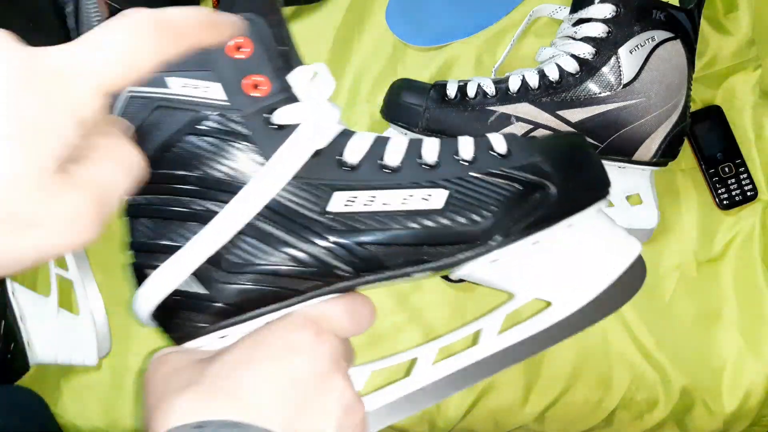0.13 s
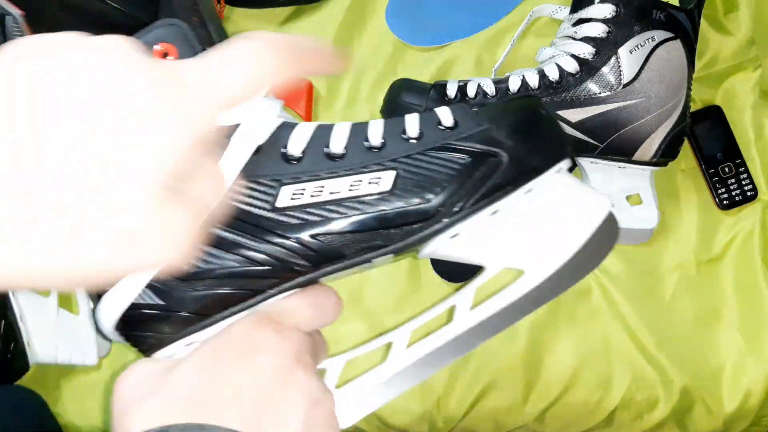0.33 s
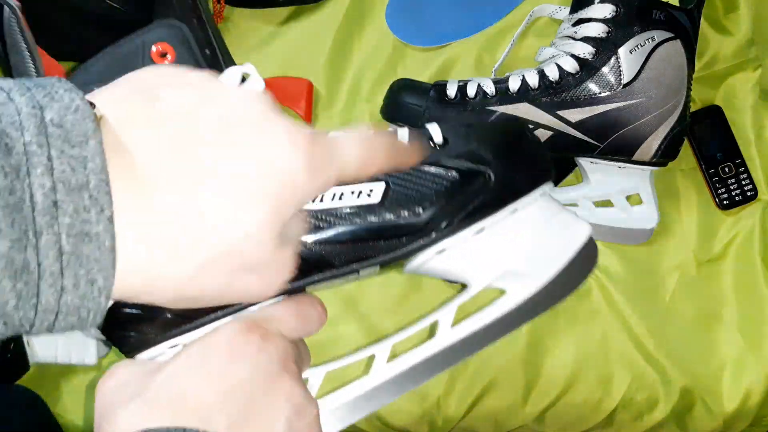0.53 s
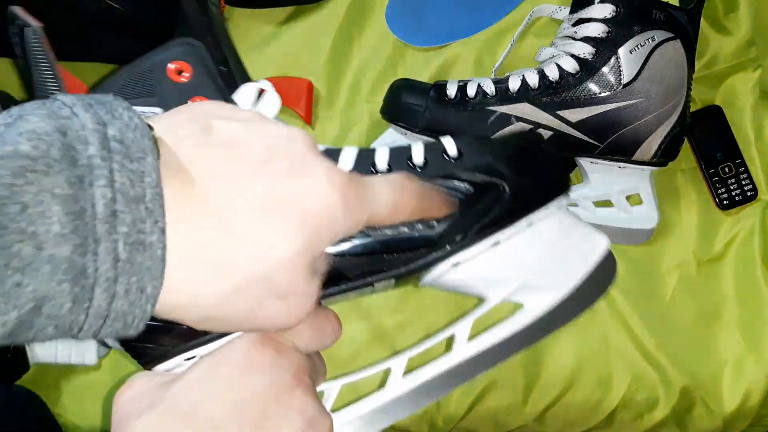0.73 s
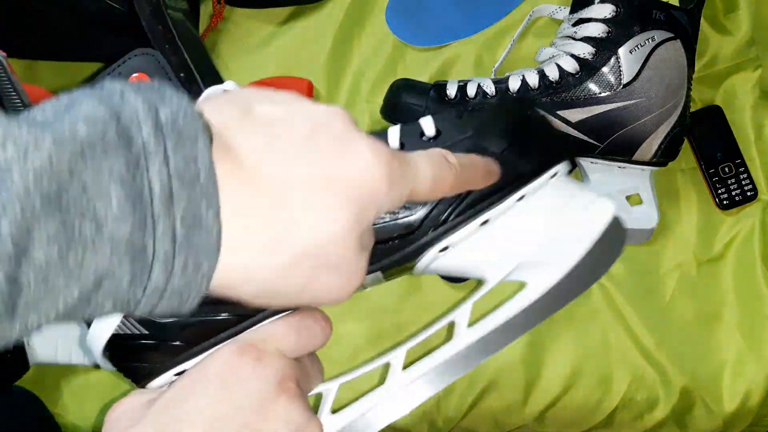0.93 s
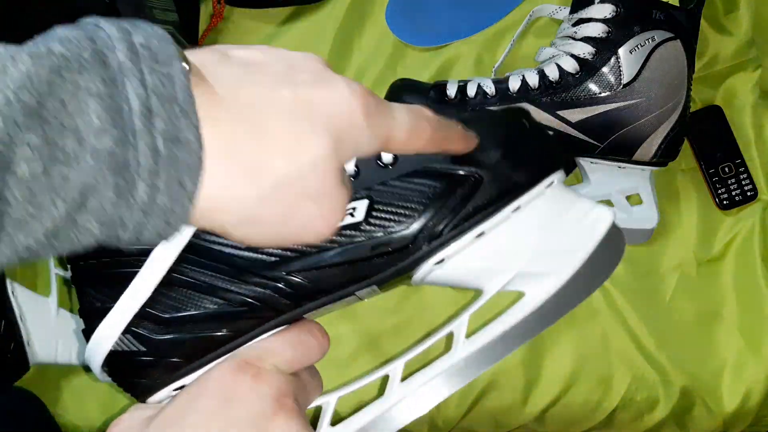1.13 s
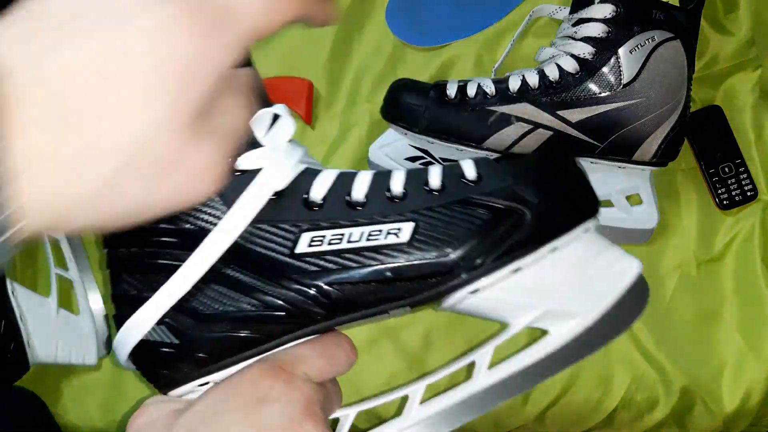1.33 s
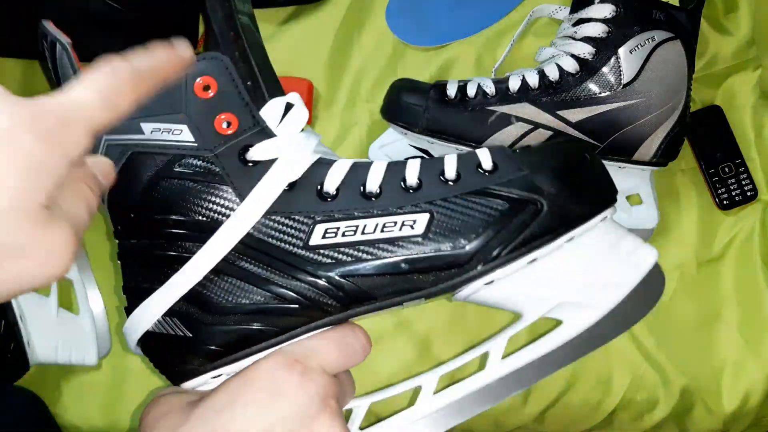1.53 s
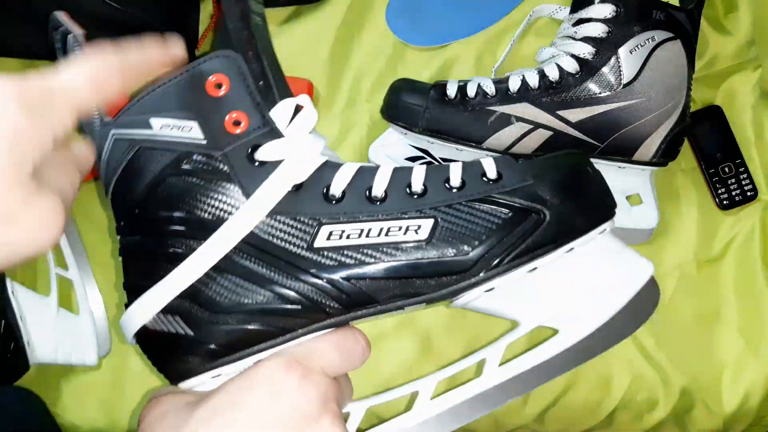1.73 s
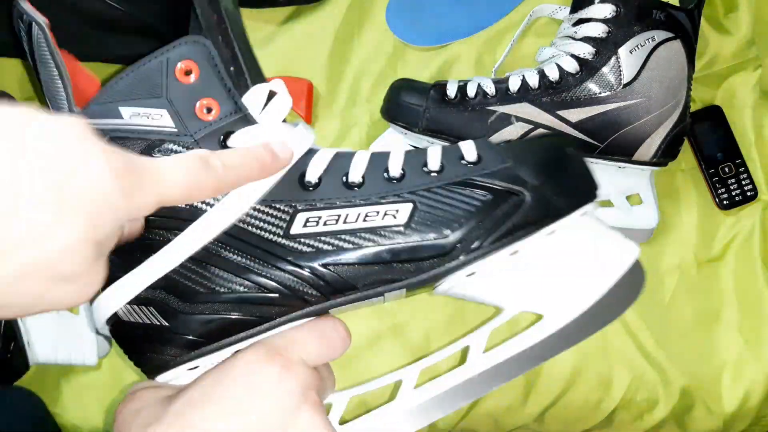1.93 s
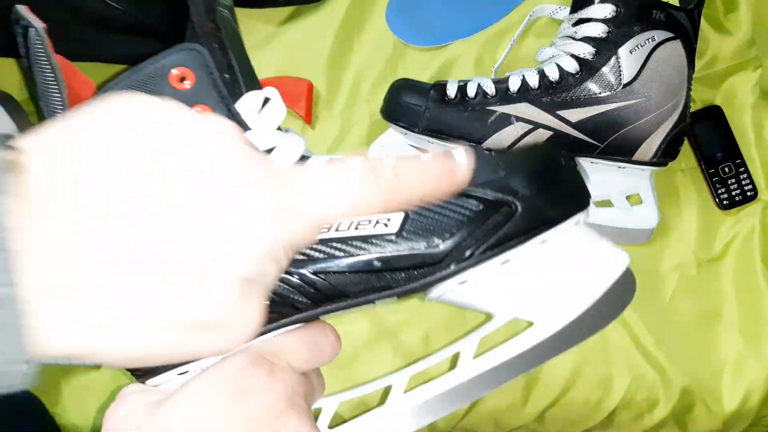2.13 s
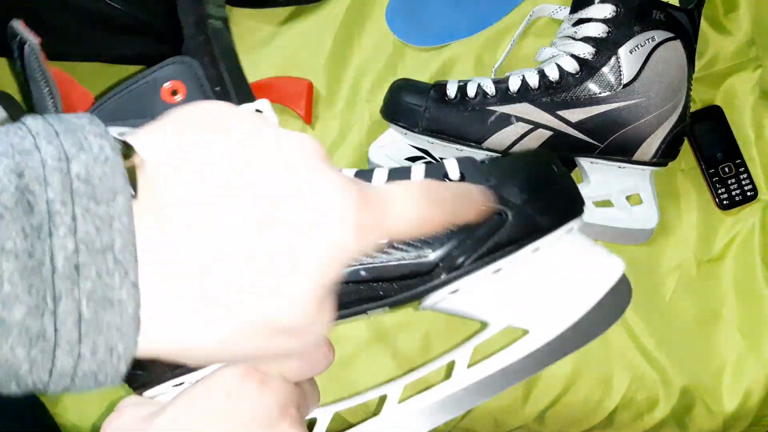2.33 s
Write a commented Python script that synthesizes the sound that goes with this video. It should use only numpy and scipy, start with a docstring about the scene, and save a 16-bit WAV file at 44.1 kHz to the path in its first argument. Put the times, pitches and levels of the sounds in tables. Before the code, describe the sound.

A finger taps a hard plastic skate boot, hollow knocks with small nail clicks, close up indoors

```python
"""Finger taps on a skate boot

A finger taps along the hard plastic shell of an ice skate boot, close to the microphone in a small, quiet room.
Each tap sums damped sines: a low thump, a hollow knock of the side wall and a brief ring of the shell.
Noise bursts and a short high ping make the nail's click; grainy noise makes its skids.
Light ticks, sleeve rustles and deep bumps of the swaying boot fall between the taps.
The room answers with a few low modes and a short noise tail, over faint rumble, hiss, whines and a low hum."""
import sys
import numpy as np
from scipy import signal
from scipy.fft import rfft, irfft, next_fast_len
from scipy.io import wavfile
from scipy.ndimage import uniform_filter1d

SR = 44100
rng = np.random.default_rng(int(sys.argv[2]) if len(sys.argv) > 2 else 0)


def waveform_to_disk(signal):
    """Save audio, clipped to [-1, 1], as 16-bit WAV at the path in sys.argv[1]."""
    frames = np.transpose(np.atleast_2d(signal))
    scaled = np.clip(frames, -1, 1) * 32767
    samples = np.round(scaled).astype(np.int16)
    wavfile.write(sys.argv[1], SR, samples)


N = 109544  # samples in the scene


def amp(db):
    """Decibels to gain."""
    return 10 ** (np.asarray(db) / 20)


def unit(x):
    """Scaled to rms 1."""
    return x / np.sqrt(np.mean(x ** 2) + 1e-20)


def along(points, hz):
    """Read a curve of (Hz, value) points on a log frequency axis."""
    f, v = np.transpose(points)
    return np.interp(np.log(hz + 1), np.log(f + 1), v)


def fade(t, t60):
    """Exponential decay by 60 dB in t60 seconds."""
    return np.exp(-np.log(1000) * t / t60)


def swell(s, width, db):
    """A bell-shaped level stroke centred on time s."""
    t = np.arange(N) / SR
    return amp(db) * np.exp(-((t - s) / width) ** 2 / 2)


def filtered(x, response):
    """Multiply the spectrum of x by a response of frequency, padded against wrap-around."""
    n = x.shape[-1]
    m = next_fast_len(n + SR // 4)
    hz = np.fft.rfftfreq(m, 1 / SR)
    return irfft(rfft(x, m) * response(hz), m)[..., :n]


def noise(spectrum, size):
    """Coloured noise of rms 1."""
    return unit(filtered(rng.standard_normal(size), lambda hz: amp(along(spectrum, hz))))


def ring(t, hz, t60, rise):
    """One damped mode with a soft start."""
    return np.sin(2 * np.pi * hz * t) * fade(t, t60) * (1 - np.exp(-t / rise)) ** 2


def lean(db):
    """Gains that raise the left by db and lower the right by as much."""
    return amp(np.array([[db], [-db]]))


def add(track, s, sound):
    """Mix a sound into the track at time s, trimmed at both ends of the track."""
    i = round(s * SR)
    part = sound[..., max(-i, 0):N - i]
    start = max(i, 0)
    track[..., start:start + part.shape[-1]] += part


# Stereo likeness of diffuse sound. Each row: frequency in Hz, left-right correlation (0 to 1).
LIKENESS = [(100, 0.97), (300, 0.85), (700, 0.2), (2000, 0.13), (5000, .1), (15000, .05)]


def spread(pair):
    """Two unrelated signals become left and right, alike in the bass and separate in the treble."""
    def mid_side_gains(hz):
        turn = np.arccos(np.clip(along(LIKENESS, hz), -1, 1)) / 2
        return np.array([np.cos(turn), np.sin(turn)])

    mid, side = filtered(pair, mid_side_gains)
    return np.array([mid + side, mid - side])


ROOM_LEAN_DB = 1.46  # raises the left, lowers the right

# Colour of the rumble and hiss. Each row: frequency in Hz, relative level in dB.
AIR_COLOUR = [(20, -28.5), (35, -17), (55, -9), (86, 9.5), (110, -18), (190, -14.5), (280, -6.5),
              (380, -17.5), (500, -24), (1000, -31), (1800, -39), (2250, -39.5), (3000, -45), (6500, -46.5),
              (8600, -53), (12000, -45.5), (15500, -44)]
# Narrow whines in the air. Each row: centre in Hz, half width in Hz, rise over the colour in dB.
WHINES = [(820, 15, 8), (1020, 35, 3), (1480, 24, 11), (2300, 49, 10)]
# Slow drift of the air. Each row: time in seconds, level in dB before AIR_LIFT_DB.
AIR_DRIFT = [(0, -53.5), (.4, -54), (.65, -52), (.85, -58), (1.3, -55), (1.6, -55), (1.85, -59), (2.1, -59),
             (2.48, -51.5)]
AIR_LIFT_DB = 4


def air():
    """Room rumble and microphone hiss: coloured noise with narrow peaks and a drifting level."""
    def response(hz):
        peaks = sum(db / (1 + ((hz - f) / width) ** 2) for f, width, db in WHINES)
        return amp(along(AIR_COLOUR, hz) + peaks)

    level_db = AIR_LIFT_DB + np.interp(np.arange(N) / SR, *np.transpose(AIR_DRIFT))
    return lean(ROOM_LEAN_DB) * amp(level_db) * unit(filtered(spread(rng.standard_normal((2, N))), response))


HUM_HZ = 134
# The hum's comings and goings. Each row: time in seconds, sine peak in dB before the stereo lean.
HUM_LEVEL = [(0, -53), (.4, -68), (.55, -51.5), (1.0, -66), (1.35, -49.5), (1.6, -62), (2.48, -72)]


def hum():
    """A low steady sine whose level comes and goes."""
    t = np.arange(N) / SR
    level = amp(np.interp(t, *np.transpose(HUM_LEVEL)))
    return lean(ROOM_LEAN_DB) * level * np.sin(2 * np.pi * HUM_HZ * t)


# Standing waves of the room. Each row: frequency in Hz, level in dB, decay time t60 in seconds.
ROOM_MODES = [(93, -14.5, .4), (137, -12.5, 0.2), (254, 1.5, 0.3), (293.9, -6.5, 0.22), (390, -12.5, .3),
              (425, -14, 0.08), (606, -2.5, 0.093)]
# Decay of the diffuse tail. Each row: frequency in Hz, t60 in seconds.
TAIL_T60 = [(150, 0.29), (500, 0.27), (2000, 0.37), (6000, 0.17), (15000, 0.15)]
# Colour of the diffuse tail. Each row: frequency in Hz, level in dB against the direct sound.
TAIL_COLOUR = [(60, -14), (130, -4), (200, -7), (300, -23), (450, -11.5), (700, -10), (2000, -13),
               (5000, -3.5), (15000, -3.5)]
TAIL_BUILD_S, ROOM_MODE_DELAY_S = 0.011, 0.01374


def room(sound):
    """The room's answer to a sound: a diffuse tail and low standing waves."""
    # all bands of noise build up alike, and each dies at its own rate
    hz, s, bands = signal.stft(rng.standard_normal((2, SR // 2)), SR, nperseg=256)
    t60 = along(TAIL_T60, hz)[:, None]
    shape = fade(s, t60) * (1 - np.exp(-s / TAIL_BUILD_S))
    tail = signal.istft(bands * shape, SR, nperseg=256)[1]
    tail = spread(tail / np.linalg.norm(tail[0]))
    tail = filtered(tail, lambda f: amp(along(TAIL_COLOUR, f)))
    t = np.maximum(np.arange(tail.shape[1]) / SR - ROOM_MODE_DELAY_S, 0)
    waves = 0
    for f, db, life in ROOM_MODES:
        gain = amp(db) * 2 * np.log(1000) / (life * SR)  # evens out long and short modes
        waves = waves + gain * np.sin(2 * np.pi * f * t) * fade(t, life)
    answer = signal.fftconvolve(sound[None], tail + waves, axes=1)[:, :len(sound)]
    return lean(ROOM_LEAN_DB) * answer


# Lead of the left microphone port. Each row: frequency in Hz, phase between the ports in radians.
LEFT_LEAD = [(100, 0.044), (300, 0.32), (700, 1.2), (1500, 1.3), (2300, 0.41), (5000, 1.5), (15000, 2.1)]
BOOT_LEAN_DB, TREBLE_EXTRA_LEAN_DB = 2, 1.36  # raise the left, lower the right


def heard(sound, lean_db):
    """A sound on the boot reaches the left port first and louder, then the room answers."""
    port_share = np.array([[.5], [-.5]])  # left early, right late
    direct = filtered(sound, lambda hz: np.exp(1j * along(LEFT_LEAD, hz) * port_share))
    return lean(lean_db) * direct + room(sound)


# Strokes of the sleeve. Each row: middle in seconds, bell width in seconds, level in dB.
RUSTLES = [(.15, 0.044, -74), (2.418, 0.042, -53)]
# Colour of the cloth. Each row: frequency in Hz, relative level in dB.
CLOTH_COLOUR = [(150, 3), (290, 30.5), (500, 7), (1000, -16), (2200, 0.5), (3000, -24), (6000, -22.5),
                (9000, -50.5), (15000, -33)]


def rustles():
    """The sleeve rustles as the arm moves: swells of soft cloth noise."""
    strokes = sum(swell(*row) for row in RUSTLES)
    return heard(strokes * noise(CLOTH_COLOUR, N), BOOT_LEAN_DB)


# The boot sways in the holding hand. Each row: middle in seconds, bell width in seconds, level in dB.
SWAYS = [(0.974, 0.061, -51), (1.49, 0.018, -54)]
# Colour of the sway. Each row: frequency in Hz, relative level in dB.
SWAY_COLOUR = [(20, -30), (40, -5.5), (60, 13.5), (90, -9), (200, -43), (1000, -90)]


def sways():
    """Deep bumps of low noise as the boot sways, equal at both ports and without room."""
    return sum(swell(*row) for row in SWAYS) * noise(SWAY_COLOUR, N)


# Skids of the finger. Each row: middle in seconds, bell width in seconds, level in dB, tilt in dB per octave.
SKIDS = [(.248, 0.015, -55, -1), (0.483, 0.023, -58, -3.5), (0.738, 0.0087, -57, -2.5),
         (1.135, .008, -62.5, 1.5), (1.179, 0.0087, -53.5, -2), (1.94, .009, -52.5, 4),
         (1.979, 0.0068, -56, 6), (2.222, 0.011, -53.5, 4)]
# Colour of the friction before the tilt. Each row: frequency in Hz, relative level in dB.
SKID_COLOUR = [(300, -6), (1000, 21), (2200, 3), (3100, -2.5), (5000, -1.5), (7500, 2), (9000, -7.5),
               (15000, -1)]
TILT_PIVOT_HZ, SKID_ROUGH_DB = 800, 3.5  # roughness is the rms level wobble


def tilted(spectrum, tilt_db):
    """A spectrum made brighter or duller by tilt_db per octave."""
    return [(hz, db + tilt_db * np.log2(hz / TILT_PIVOT_HZ)) for hz, db in spectrum]


def skids():
    """Grainy friction as the finger slides a little on the textured shell."""
    rub = sum(swell(s, width, db) * noise(tilted(SKID_COLOUR, tilt_db), N)
              for s, width, db, tilt_db in SKIDS)
    wobble = unit(uniform_filter1d(rng.standard_normal(N), size=40))  # grains of about 1 ms
    grain = unit(amp(SKID_ROUGH_DB * wobble))
    return heard(grain * rub, BOOT_LEAN_DB)


# The nail touches again or the boot shifts. Each row: start in seconds, level in dB, t60 in seconds.
TICKS = [(.009, -50, 0.0068), (.256, -52, 0.0098), (0.331, -57.5, .008), (.378, -61.5, .008),
         (.486, -46.5, .022), (0.4903, -54.5, 0.013), (0.614, -65, 0.009), (0.7191, -51.5, 0.012),
         (.812, -60.5, 0.014), (0.9515, -50.5, 0.0091), (1.148, -52.5, 0.012), (1.1524, -49, 0.02),
         (1.977, -52, 0.0077), (2.0043, -61, .008), (2.095, -62, 0.007), (2.226, -46, .018),
         (2.2478, -53.5, 0.008)]
# Colour of a tick. Each row: frequency in Hz, relative level in dB.
TICK_COLOUR = [(800, -22), (3200, -5.5), (4800, 7.5), (6000, -2.5), (7300, 2), (8800, -16.5), (12000, 1.5),
               (15500, 0.5)]


def ticks():
    """Tiny contacts, too light to ring the shell: short fading noise bursts."""
    out, t = np.zeros((2, N)), np.arange(SR // 4) / SR
    for s, db, t60 in TICKS:
        tick = amp(db) * noise(TICK_COLOUR, len(t)) * fade(t, t60)
        add(out, s, heard(tick, BOOT_LEAN_DB + TREBLE_EXTRA_LEAN_DB))
    return out


CONTACT_HZ = 1480  # where a tap's dullness is read


def softened(dull_db, hz):
    """A soft contact lasts longer and so loses treble ever more steeply (dB)."""
    return -abs(dull_db) * (hz / CONTACT_HZ) ** 2


# The shell's higher modes. Each row: pitch in Hz before detuning, level in dB over the tap's shell level
# before softening, t60 in seconds.
SHELL_MODES = [(481, 1, 0.012), (633, -5.5, 0.067), (722, -4, 0.045), (908, -1, 0.02), (1037, 3, 0.012),
               (1155, -6.5, .03), (1268, -8.5, .035), (1680, -14.5, 0.018), (1880, -17, 0.0095),
               (2066, -8.5, 0.042), (2180, -9, 0.021), (2434, -7, 0.016)]
# Dense, quickly damped ring between those modes. Each row: frequency in Hz, relative level in dB.
CRACK_COLOUR = [(200, -21.5), (500, 4.5), (1100, -3), (1600, 4), (2400, 4.5), (2900, -24.5), (6000, -49),
                (15000, -73)]
CRACK_DB, CRACK_T60_S = -9, 0.027  # level against the tap's shell level
SPOT_DETUNE = 0.034  # typical share by which the higher modes shift from spot to spot
SHELL_ONSET_S = 0.0005


def shell_ring(t, shell_db, dull_db):
    """The struck shell rings in many modes over a dense crack; a dull contact excites less treble."""
    modes = 0
    for k, (hz, db, t60) in enumerate(SHELL_MODES):
        level_db = shell_db + db + softened(dull_db, hz) + rng.normal(0, 0.5)
        pitch = hz * (1 + SPOT_DETUNE * rng.normal())
        sign = (-1) ** k  # neighbouring modes start in opposite directions
        modes = modes + sign * amp(level_db) * ring(t, pitch, t60, SHELL_ONSET_S)
    colour = [(hz, db + softened(dull_db, hz)) for hz, db in CRACK_COLOUR]
    crack = noise(colour, len(t)) * fade(t, CRACK_T60_S) * (1 - np.exp(-t / SHELL_ONSET_S))
    return modes + amp(shell_db + CRACK_DB) * crack


# Colour of the nail's click. Each row: frequency in Hz, relative level in dB.
NAIL_COLOUR = [(500, -23.5), (2000, 0.5), (3100, -11), (4500, 6), (7300, 2), (8600, -0.5), (11000, 5.5),
               (15500, 4.5)]
CLICK_T60_S, PING_DB, PING_T60_S = 0.0092, 0, 0.0041  # ping level is over the tap's nail level


def nail_click(t, nail_db, nail_hz):
    """The hard nail gives a fading noise click and a very short high ping."""
    click = noise(NAIL_COLOUR, len(t)) * fade(t, CLICK_T60_S)
    ping = amp(PING_DB) * np.sin(2 * np.pi * nail_hz * t) * fade(t, PING_T60_S)
    return amp(nail_db) * (click + ping)


# The taps. Each row: start in seconds (below zero: begun before the scene), thump in dB, wall pitch in Hz,
# wall in dB, wall t60 in seconds, wall rise in seconds, rib pitch in Hz, rib in dB, shell in dB,
# dullness in dB lost at CONTACT_HZ (sign ignored), nail in dB, nail pitch in Hz.
# Thump, wall and rib levels are before the soft start.
TAPS = [(-.011, -20, 307, -11, 0.04, 0.0021, 388, -20, -41, -3.5, -51, 5950),
        (0.2254, -20.5, 318, 6.5, 0.023, 0.0032, 380, -23.5, -30.5, -14, -48, 4980),
        (0.4651, -24, 309, -15.5, 0.048, 0.0021, 419, -14, -26.5, -9, -51.5, 4830),
        (0.6958, -26.5, 237, -16.5, 0.026, 0.0024, 403, -19, -33.5, -7, -43.5, 7200),
        (0.9257, -26.5, 284, -17.5, 0.056, 0.0014, 444, -30.5, -38.5, -1.5, -45, 7060),
        (1.1271, -25.5, 261, -20.5, 0.023, 0.0017, 422, -22, -40, -4, -52.5, 6900),
        (1.4545, -21.5, 315.4, 9, 0.029, 0.0039, 370.4, -3.5, -25.5, -15.5, -53.5, 6900),
        (1.6613, -27.5, 313.6, -7.5, 0.033, 0.0031, 371.6, -18, -53, -5, -42, 6150),
        (1.9238, -27, 294.4, -10.5, .03, 0.0021, 358.5, -20.5, -36.5, -29, -55, 6600),
        (2.2067, -31, 318, -16, 0.056, 0.0011, 380, -15.5, -31, 0.5, -42, 7370)]
THUMP_HZ, THUMP_T60_S, THUMP_RISE_S = 122.2, 0.053, 0.0025  # the whole boot gives in the hand
RIB_T60_S, RIB_RISE_S = 0.036, 0.0028


def taps():
    """Each spot of the boot has its own wall pitch; the finger pad gives a dull knock, the nail a bright one."""
    out, t = np.zeros((2, N)), np.arange(SR // 2) / SR
    for (s, thump_db, wall_hz, wall_db, wall_t60, wall_rise, rib_hz, rib_db,
         shell_db, dull_db, nail_db, nail_hz) in TAPS:
        thump = amp(thump_db) * ring(t, THUMP_HZ, THUMP_T60_S, THUMP_RISE_S)
        wall = amp(wall_db) * ring(t, wall_hz, wall_t60, wall_rise)
        rib = amp(rib_db) * ring(t, rib_hz, RIB_T60_S, RIB_RISE_S)
        # wall and rib start against the thump
        knock = thump - (wall + rib) + shell_ring(t, shell_db, dull_db)
        nail = nail_click(t, nail_db, nail_hz)
        add(out, s, heard(knock, BOOT_LEAN_DB) + heard(nail, BOOT_LEAN_DB + TREBLE_EXTRA_LEAN_DB))
    return out


def scene():
    """Everything at the two microphone ports."""
    return air() + hum() + rustles() + sways() + skids() + ticks() + taps()


TOP_HZ = 16100


def record(dry):
    """The recorder keeps nothing above its band limit."""
    return filtered(dry, lambda hz: hz < TOP_HZ)


dry = scene()
out = record(dry)
waveform_to_disk(out)
```